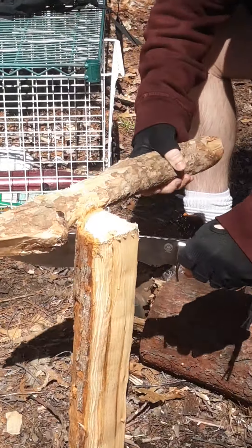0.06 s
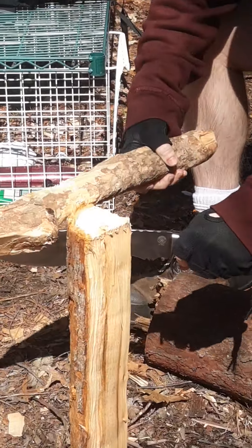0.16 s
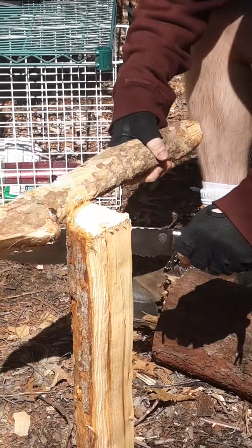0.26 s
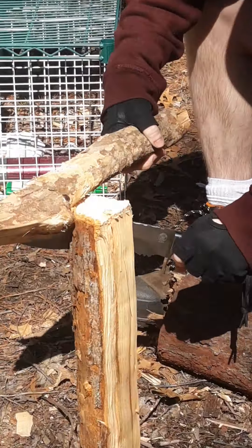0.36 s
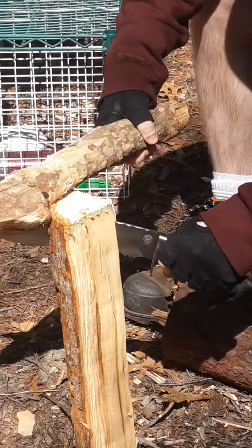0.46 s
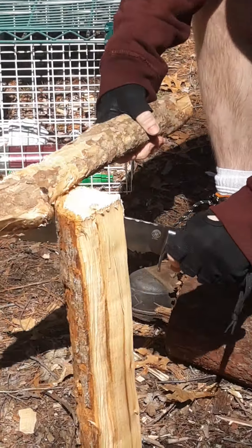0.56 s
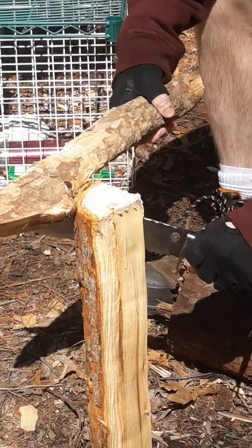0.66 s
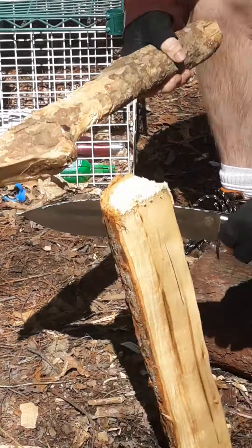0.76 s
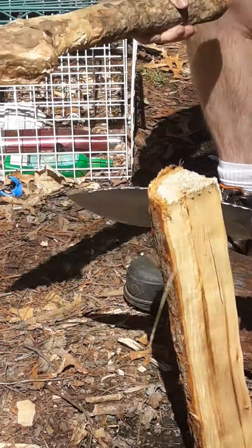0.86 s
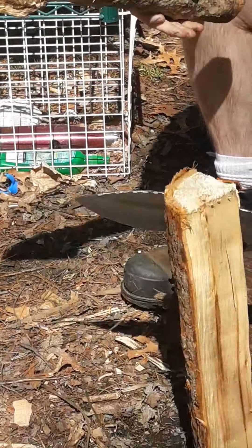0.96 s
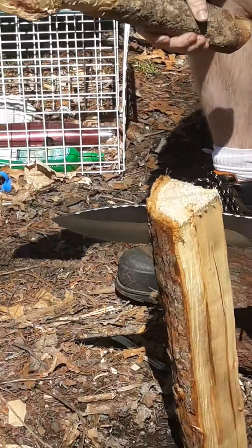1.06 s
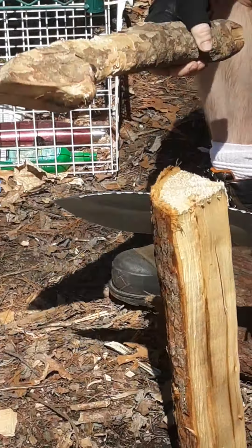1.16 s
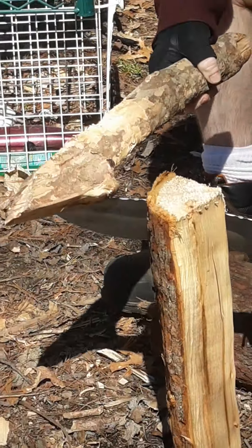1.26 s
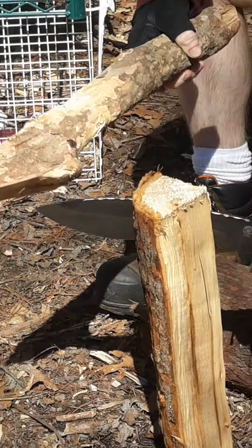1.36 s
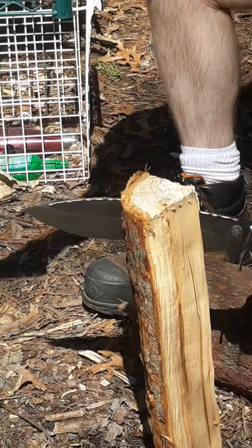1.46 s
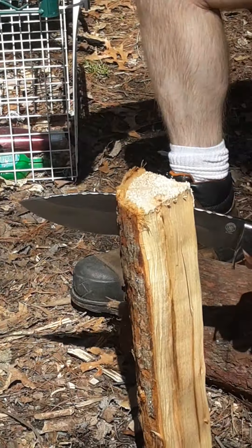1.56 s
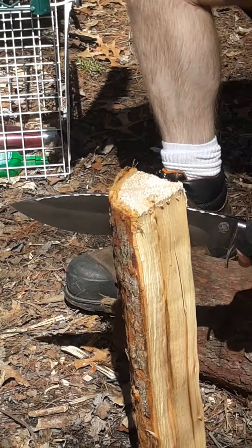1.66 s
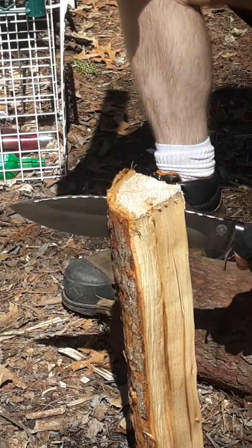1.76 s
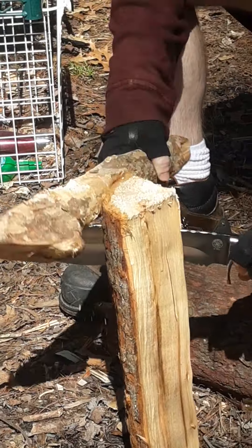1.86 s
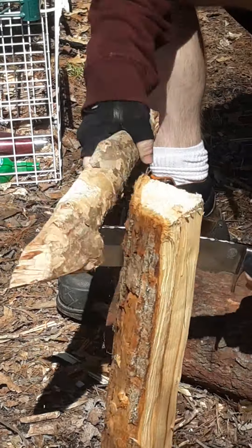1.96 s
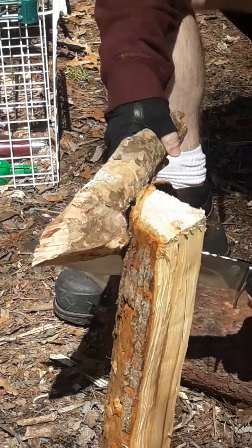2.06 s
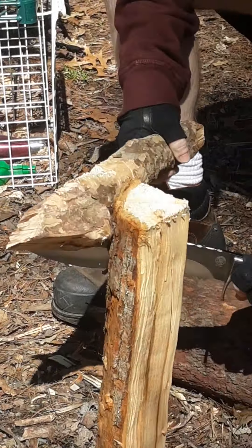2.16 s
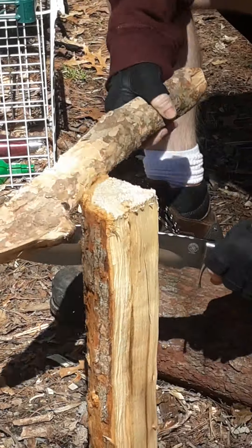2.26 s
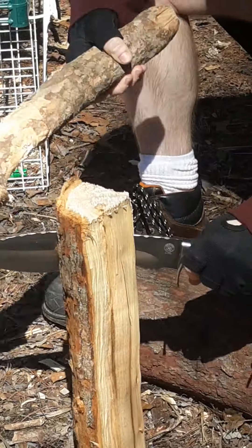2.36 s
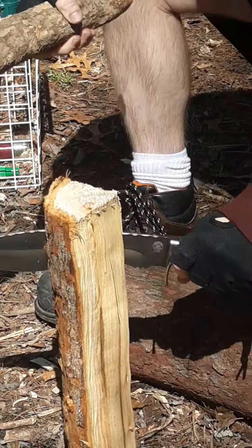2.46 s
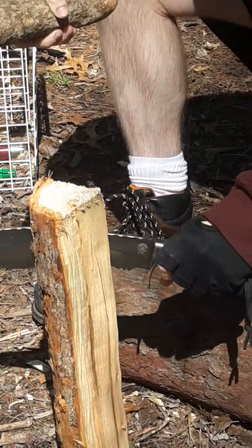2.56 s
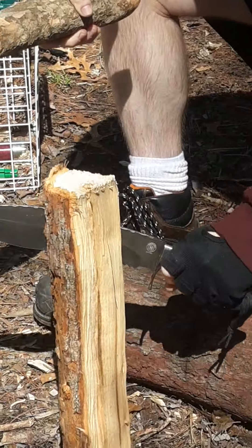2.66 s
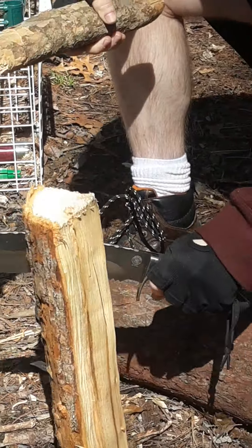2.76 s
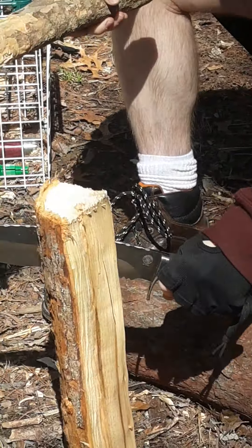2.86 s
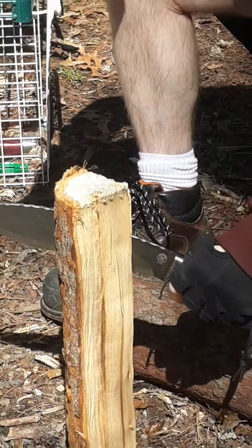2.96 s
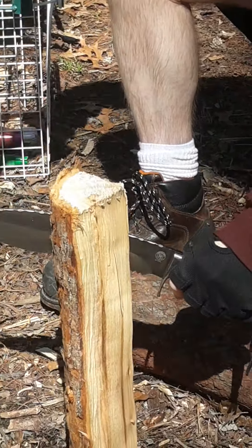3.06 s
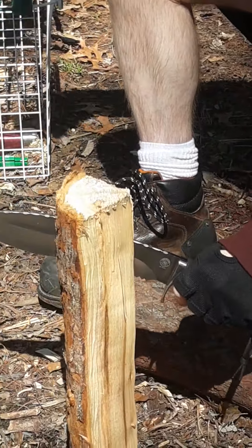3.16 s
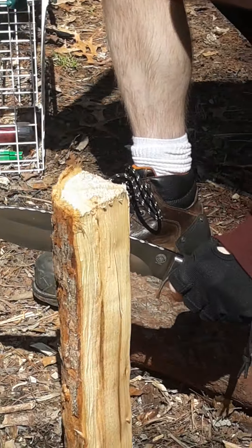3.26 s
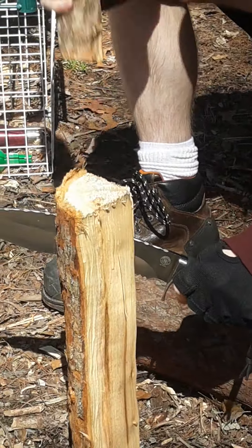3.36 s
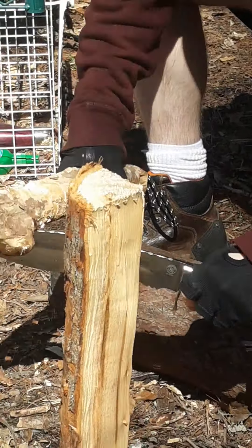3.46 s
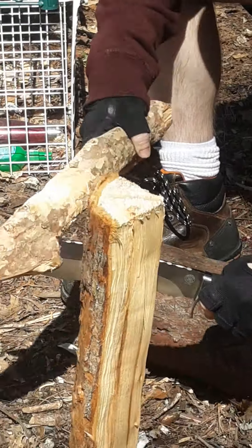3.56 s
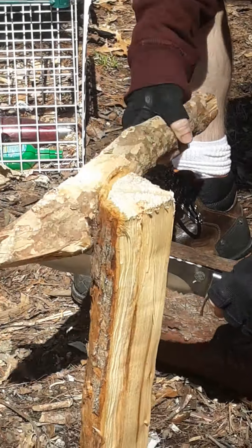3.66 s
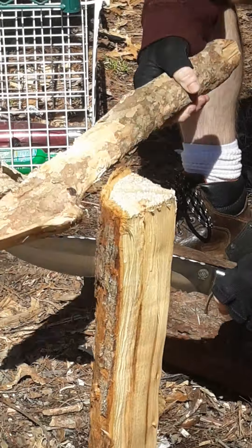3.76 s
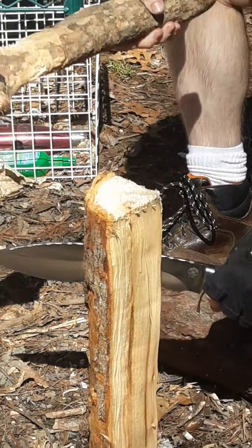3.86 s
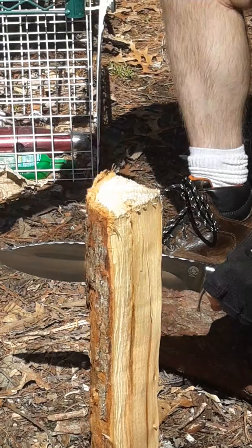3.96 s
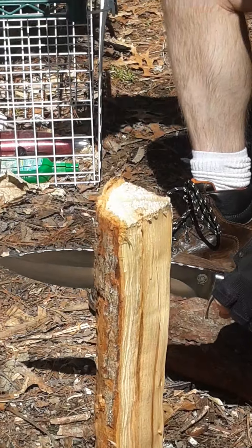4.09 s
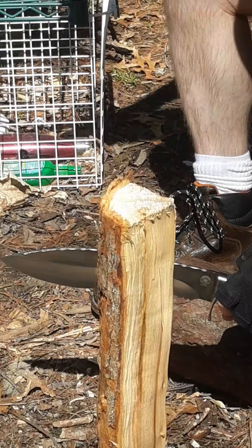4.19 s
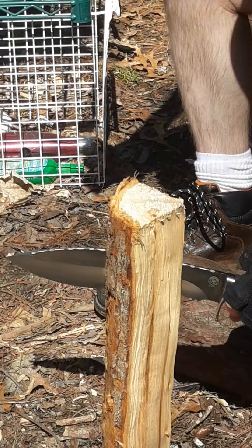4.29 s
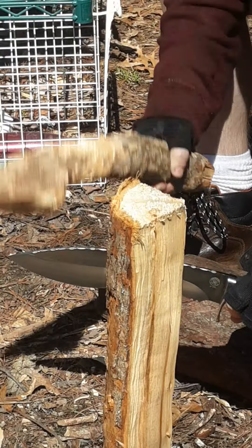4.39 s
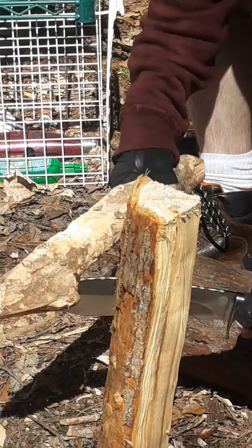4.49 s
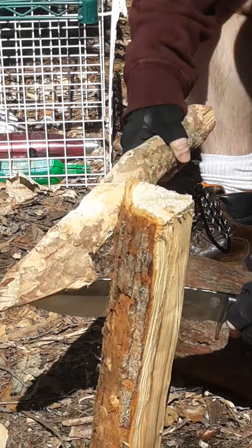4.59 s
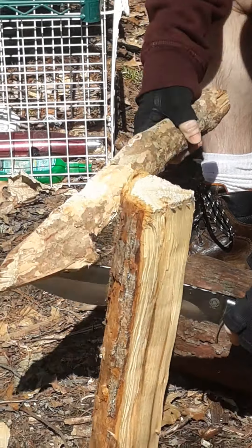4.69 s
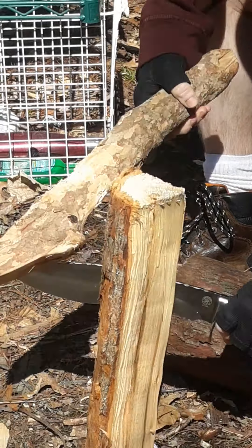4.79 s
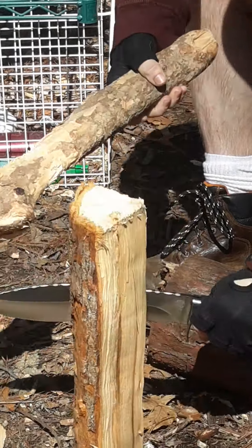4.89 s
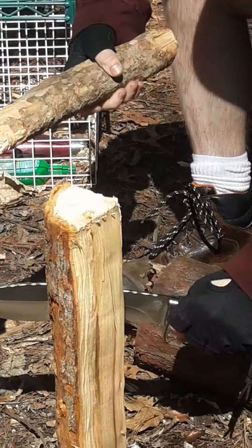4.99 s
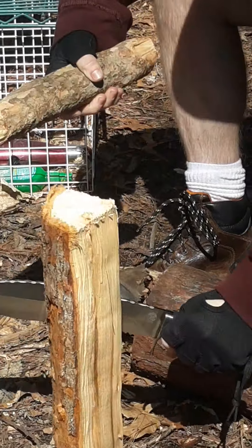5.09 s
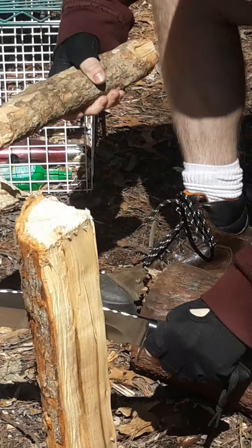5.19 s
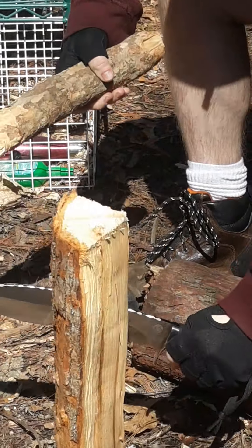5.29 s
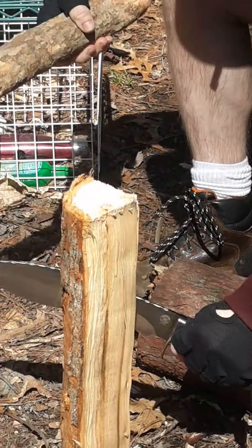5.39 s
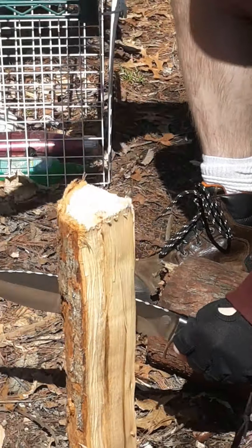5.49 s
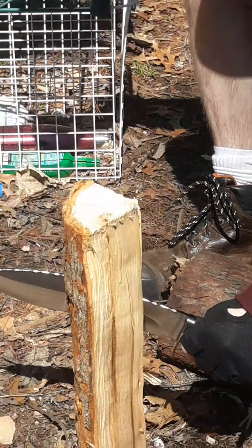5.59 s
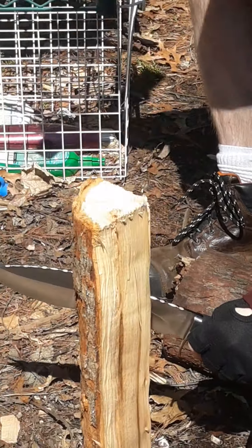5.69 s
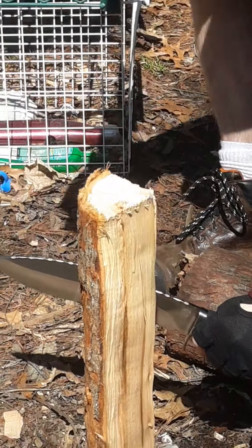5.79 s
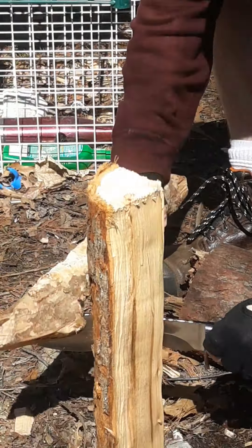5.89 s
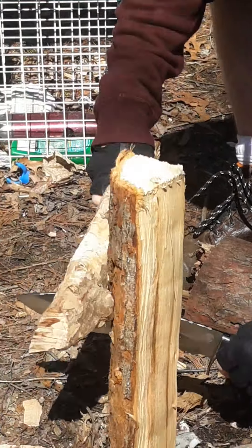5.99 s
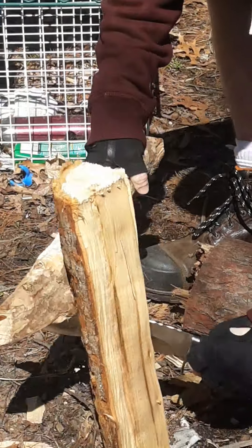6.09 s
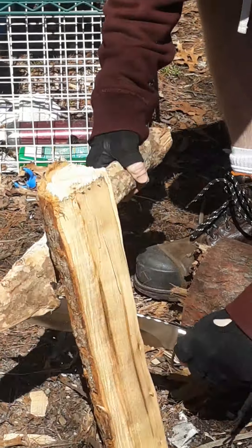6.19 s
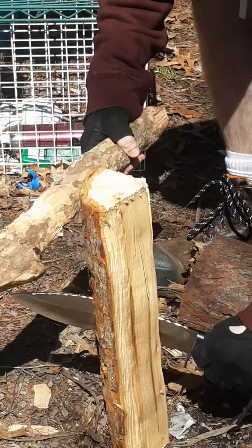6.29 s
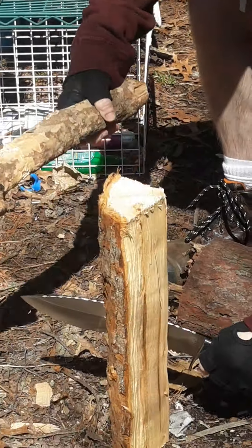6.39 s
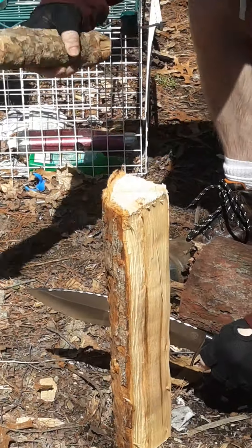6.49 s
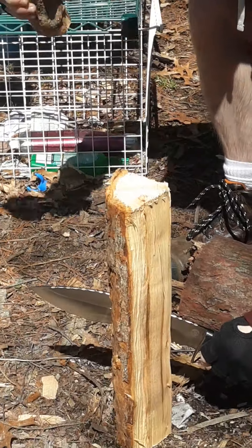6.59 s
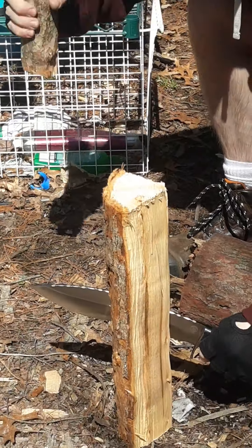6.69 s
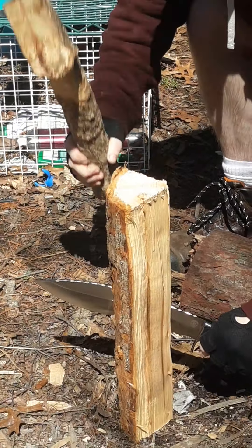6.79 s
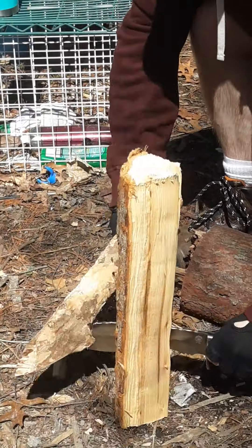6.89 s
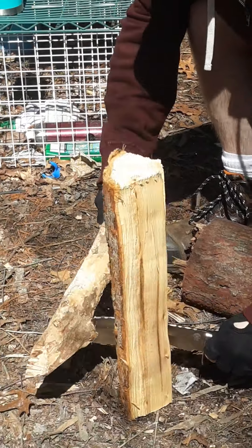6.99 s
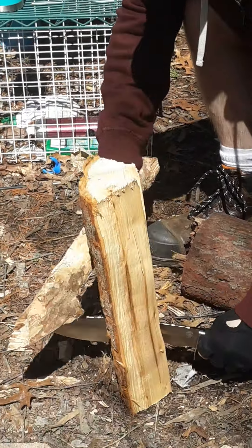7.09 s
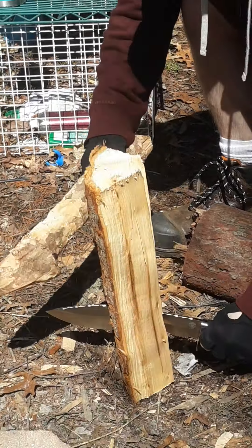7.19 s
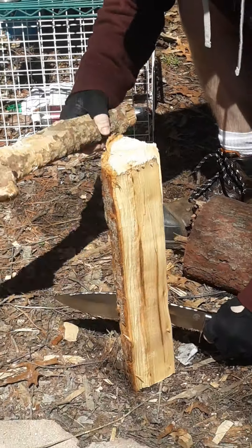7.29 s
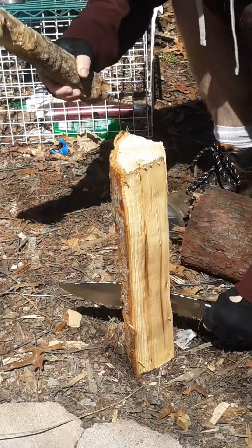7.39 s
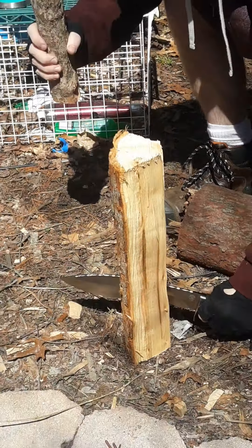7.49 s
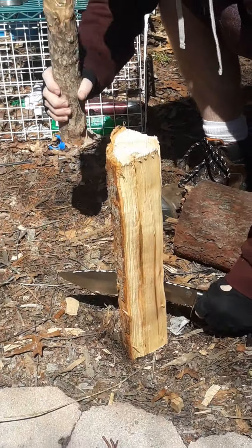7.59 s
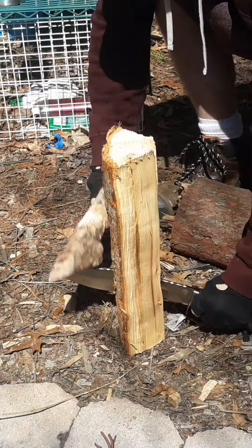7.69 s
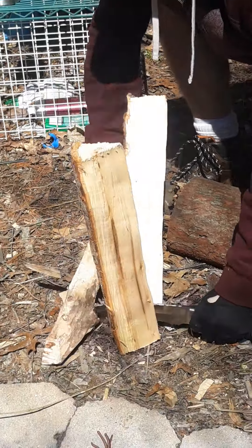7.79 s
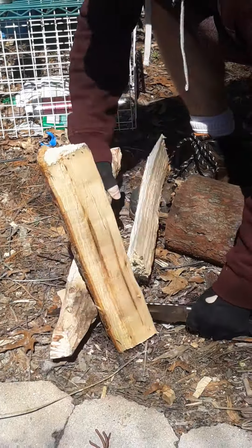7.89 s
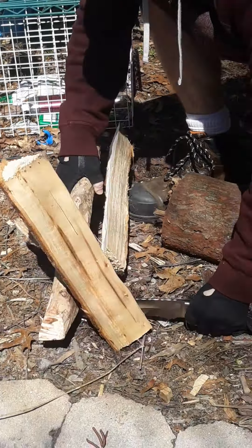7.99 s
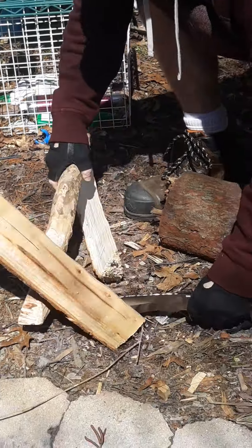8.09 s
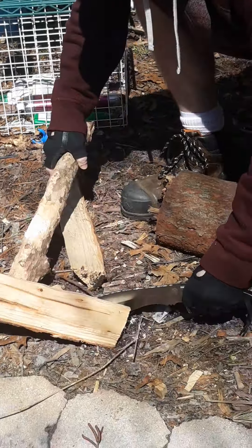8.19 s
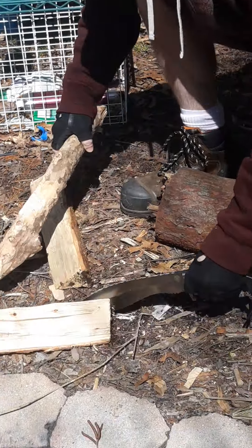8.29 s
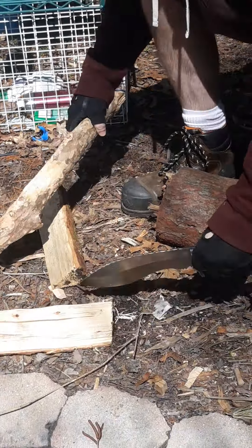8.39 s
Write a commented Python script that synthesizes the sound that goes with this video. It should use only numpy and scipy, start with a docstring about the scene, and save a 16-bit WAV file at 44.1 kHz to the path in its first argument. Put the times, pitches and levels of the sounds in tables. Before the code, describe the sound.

In a quiet yard, dry leaves and clothes rustle softly close by, with small twig clicks. A faint woodpecker chatters in quick, short notes until about 3.5 seconds, and distant traffic swells and fades throughout with a low engine hum. A branch strikes the back of a knife wedged in a log at about 1.9, 3.5, 4.5, 5.9, 6.9 and 7.7 seconds. Each blow is a loud, close, dry wooden crack, trailed by crackling fibres and a brief metallic rattle of the blade. The tearing is strongest after the first, second and fourth blows, with a sharp snap at 6 seconds. Between 6.4 and 7.4 seconds a far crow caws three times and a small bird whistles twice, both barely audible. The last blow splits the log, and the halves tumble with light knocks from 7.9 seconds, landing with a thud at 8.3.

```python
"""A branch strikes the spine of a knife six times and drives it down a log: each blow cracks and rings
the wood, fibres tear and snap, the wedged blade rattles, the halves fall. Dry leaves and clothes rustle
close by as grainy hiss. A woodpecker chatters in short arched notes, a small bird whistles, a crow caws
hoarsely, and far-off road traffic swells with rumble, tyre roar and an engine note.
A phone with two microphone ports listens in a yard."""
import sys
import numpy as np
from scipy import signal
from scipy.fft import rfft, irfft, next_fast_len
from scipy.io import wavfile
from scipy.ndimage import uniform_filter1d, map_coordinates

SR = 44100
rng = np.random.default_rng(int(sys.argv[2]) if len(sys.argv) > 2 else 0)


def transcribe(signal):
    """Save signal, clipped to [-1, 1], as a 16-bit WAV file at the path in sys.argv[1]."""
    frames = np.atleast_2d(signal).T
    limited = np.clip(frames, -1, 1)
    pcm = np.round(limited * 32767).astype(np.int16)
    wavfile.write(sys.argv[1], SR, pcm)


N = 372644

# Hits of branch, blade, log and ground: (time [s], crack [dB], ground [dB], branch [dB], log [dB],
# log tilt [dB/octave], upper wood [dB])
HITS = [(1.898, -19.5, -28, -24.5, -21.5, 9, -8), (1.9089, -31, -25.5, -12.5, -19, 4.5, -21.5),
        (1.934, -39, -29, -33.5, -40.5, 1, -27), (3.464, -16.5, -32.5, -27.5, -22, 2.5, -7.5),
        (3.4753, -24.5, -26.5, -21, -28.5, 5, -16), (3.5004, -31, -31.5, -37, -36.5, -0.5, -28.5),
        (4.4533, -13.5, -37, -29.5, -17.5, 5, -8), (4.4631, -29.5, -33.5, -37.5, -33, 5.5, -19.5),
        (4.6688, -67, -63, -48, -47.5, 4, -54), (5.9237, -16.5, -30, -24, -19.5, 5.5, -4),
        (5.936, -19.5, -32, -28.5, -33, 3.5, -13.5), (6.8839, -21.5, -53, -30.5, -20.5, 9, -9.5),
        (6.892, -22.5, -47, -43, -43, -7, -23), (7.7446, -19, -59, -23.5, -13.5, 6.5, -21),
        (7.772, -36, -41, -36.5, -38.5, -1, -26.5), (8.31, -34.5, -34, -32.5, -21.5, 3, -39)]
# Modes a hit rings, in order ground, ground, log, branch, log, log, upper wood, crack:
# (pitch [Hz], level [dB], t60 [s], pan left [dB], left phase lead [rad], phase drift per sample [rad])
HIT_MODES = [(59.5, -3, .15, 1, .3, .04), (115, -2, 0.22, -0.5, 0.3, 0.062),
             (294, 0.5, 0.044, -1, 0.28, 0.098), (501, -1, 0.06, -4, 0.37, 0.017),
             (699, -4, 0.032, .5, 0.4, 0.11), (924, -1.5, 0.022, 2.5, 0.2, 0.14),
             (1269.7, 0, 0.031, 2.5, 1.7, 0.072), (2209.5, 0.5, 0.024, 8, 2, 0.2)]

def blows():
    """Every contact gives a sharp crack and rings the modes of wood and ground."""
    out = np.zeros((2, N))
    pivot_hz = 463
    for s, crack_db, ground_db, branch_db, log_db, tilt_db, upper_db in HITS:
        add(out, s, amp(crack_db) * pan(2.6) * puff(.016))
        log = [log_db + tilt_db * np.log2(mode[0] / pivot_hz) for mode in HIT_MODES]
        drives = [ground_db, ground_db, log[2], branch_db, log[4], log[5], upper_db, crack_db]
        for drive_db, (hz, db, t60, pan_db, lead, drift) in zip(drives, HIT_MODES):
            add(out, s, amp(db + drive_db) * pan(pan_db) * ring(hz, t60, lead, drift, attack_s=.0018))
    return out


# Tears, the first the tail of an earlier blow:
# (time [s], level [dB], t60 [s], low blade ring [dB], high blade ring [dB])
TEARS = [(0, -66, 0.97, -49.5, -49.5), (1.897, -21, 0.4, -27.5, -37.5), (3.463, -19.5, 0.39, -25.5, -34),
         (4.455, -33, 0.43, -31.5, -30), (5.924, -21.5, 0.4, -25.5, -28), (6.885, -37, 0.31, -38.5, -51),
         (7.747, -26.5, 0.16, -43, -47), (8.312, -45.5, 0.13, -53, -57)]
# Resonances of the splitting log, four of body, two of treble: (centre [Hz], width [Hz], level [dB])
LOG_BANDS = [(75, 240, -5), (530, 510, -11.5), (1260, 400, -1), (1930, 490, -5), (4300, 2500, -3.5),
             (11100, 9800, -7)]
# Low and high resonance of the wedged blade: (centre [Hz], width [Hz], level [dB])
BLADE_BANDS = [(1310, 76, 1.77), (2120, 88, -3.5)]

def tearing():
    """After each blow the split runs on: dying crackle through the log, and a rattle of the blade."""
    t = np.arange(N) / SR
    body, treble, blade_low, blade_high = np.zeros((4, N))
    treble_decay_ratio, rattle_t60_s = .77, .8
    for s, db, t60, low_ring_db, high_ring_db in TEARS:
        decay = lambda db, t60: (t > s) * amp(db - 60 * np.abs(t - s) / t60)
        body += decay(db, t60)
        treble += decay(db, treble_decay_ratio * t60)
        blade_low += decay(low_ring_db, rattle_t60_s)
        blade_high += decay(high_ring_db, rattle_t60_s)
    crackle = grains(lumpy_db=1.5, rate=210)
    wood = resonate(body * crackle, LOG_BANDS[:4]) + resonate(treble * crackle, LOG_BANDS[4:])
    steel = resonate(blade_low * crackle, BLADE_BANDS[:1])
    steel += resonate(blade_high * crackle, BLADE_BANDS[1:])
    return pan(.6) * (wood + steel)


# Snaps of fibre, twig and leaf: (time [s], level [dB], body over level [dB], length [s])
SNAP_CUES = [(0.856, -53.5, 1, 0.012), (0.929, -56, -6, .008), (1.034, -44.5, -23, 0.017),
             (1.1195, -43.5, -6.5, 0.0165), (1.2286, -60, -6, 0.012), (1.334, -45.5, -11, 0.011),
             (1.4419, -48, -16, .009), (1.453, -44, -15, .01), (1.536, -58, -7, .009),
             (1.6192, -58.5, -9, .01), (1.735, -54, -7, .009), (2.18, -53, .5, 0.013),
             (2.5543, -56, -5.5, 0.015), (2.919, -66.5, -8, .01), (3.7262, -53, 2, 0.0089),
             (3.7763, -52, -6, 0.018), (4.172, -56, -12, 0.013), (4.601, -42, -3, 0.0114),
             (4.74, -57, -4, 0.012), (5.456, -63, -13, .009), (5.4663, -57, -9, .011),
             (5.516, -65.5, -3.5, .012), (6.0269, -16, 3, .006), (6.2073, -44, 5.5, 0.0075),
             (6.282, -59.5, -8, 0.0095), (6.352, -60, -11, .01), (6.429, -60, -10, 0.011),
             (6.447, -64, -9, .01), (7.7162, -56, 9, 0.01), (7.909, -36.5, -5, 0.018),
             (7.932, -43, 2.5, 0.034), (7.9825, -52, -11, 0.013), (8.143, -45, -8, 0.0208),
             (8.312, -32.5, 20.5, 0.0095)]

def snaps():
    """Small things break with dry clicks, each with its own weight below the crossover."""
    top, body = np.zeros((2, 2, N))
    crossover_hz = 4600
    for s, db, body_db, length in SNAP_CUES:
        click = amp(db) * pan(1.5) * puff(length)
        add(top, s - .001, click)
        add(body, s - .001, amp(body_db) * click)
    top = filtered(top, lambda hz: 1 / (1 + (crossover_hz / (hz + 1)) ** 8))
    return top + filtered(body, lambda hz: 1 / (1 + (hz / crossover_hz) ** 8))


# Light wooden knocks: (time [s], level [dB], pitch [Hz], t60 [s])
KNOCKS = [(3.795, -56, 1500, 0.047), (6.934, -44.5, 294, 0.027), (7.063, -54.5, 316, 0.057),
          (7.909, -45.5, 675, 0.11), (7.943, -34.5, 220, 0.035), (7.983, -47, 695, 0.079),
          (8.147, -60.5, 1100, 0.13), (8.15, -45.5, 196, 0.068), (8.312, -42, 1063, 0.086),
          (8.322, -29.5, 196, 0.05)]

def knocks():
    """Pieces touch and tumble, each touch ringing one damped mode."""
    out = np.zeros((2, N))
    for s, db, hz, t60 in KNOCKS:
        add(out, s, amp(db) * pan(2.05) * ring(hz, t60, lead=.21, drift=.071, attack_s=.0004))
    return out


# Stirs of leaves or cloth: (time [s], level [dB], 10 dB swell [s], 10 dB fade [s], body over level [dB])
RUSTLES = [(.08, -82, 0.14, .2, 4), (.36, -66, 0.037, 0.15, 2.5), (.8, -66, 0.11, 0.099, -3.5),
           (1.12, -64.5, 0.089, 0.1, -2.5), (1.36, -71.5, 0.054, 0.12, -6), (1.7, -75.5, 0.21, 0.49, -1.5),
           (2.6, -75, 0.073, 0.17, -6), (3.07, -78.5, 0.107, 0.2, -6), (3.43, -77.5, 0.18, .2, 3),
           (4.9, -84, .2, .12, 1.5), (5.21, -72, 0.081, 0.12, -10.5), (5.88, -75.5, .2, .3, -3.5),
           (6.45, -88.5, .1, 0.11, 0), (6.76, -89, 0.11, .2, -5), (7.24, -86.5, 0.14, 0.17, 4.5),
           (8.06, -69.5, 0.19, 0.26, -9), (8.27, -71.5, .15, 0.12, -8), (8.37, -70, 0.037, 0.063, 8)]
# Tone of the rustle: (frequency [Hz], gain [dB])
RUSTLE_EQ = [(900, -20), (2500, -2), (4500, 2.5), (5800, 4.5), (8800, 5), (12000, 9), (16000, 6.5)]

def rustle():
    """Leaves and cloth stir in swells of grainy hiss, over a faint steady hiss."""
    t = np.arange(N) / SR
    rest_db, steady_db = -98, -90
    top_gain, body_gain = np.full((2, 2, N), amp(rest_db))
    for s, db, swell, fade, body_db in RUSTLES:
        stir = amp(db - 10 * np.maximum((s - t) / swell, (t - s) / fade))
        top_gain += stir
        body_gain += amp(body_db) * stir
    hiss = filtered(grains(lumpy_db=2, rate=130), lambda hz: amp(along(RUSTLE_EQ, hz)))
    body = filtered(hiss, lambda hz: 1 / (1 + (hz / 4700) ** 6))
    steady = filtered(rng.standard_normal((2, N)), lambda hz: 1 / (1 + (5000 / (hz + 1)) ** 4))
    return top_gain * (hiss - body) + body_gain * body + amp(steady_db) * steady


# Contour of the woodpecker's call: (time [s], level [dB], pitch [Hz])
CHATTER = [(0, -70, 2170), (.3, -77, 2160), (.65, -77.5, 2270), (1.1, -71, 2160), (1.8, -70, 2160),
           (2.3, -76.5, 2120), (2.9, -87.5, 2110), (3.4, -76, 2110)]

def woodpecker():
    """A long run of short notes, each arching in pitch; the first few come closer together."""
    out = np.zeros((2, N))
    notes, note_s, spacing_s = 31, .03, .1127
    u = np.linspace(0, 1, round(note_s * SR))
    call_db, call_hz = automation(CHATTER)
    for k, (louder, higher) in enumerate(rng.standard_normal((notes, 2))):
        hurry_s = .05 * (1 - np.exp(-k / 5))
        s = .056 + k * spacing_s - hurry_s
        db = call_db[round(s * SR)] + 1.2 * louder
        hz = call_hz[round(s * SR)] * (1 + .006 * higher)
        phase = 2 * np.pi * np.cumsum(hz * (1.01 - .41 * (u - .45) ** 2)) / SR
        rasp = .063 * np.cumsum(rng.standard_normal(len(u)))
        add(out, s, amp(db) * pan(.5) * np.sin(np.pi * u) * np.sin(phase + rasp))
    return out


# The small bird's notes: (time [s], length [s], pitch [Hz], level [dB])
WHISTLE_CUES = [(6.681, 0.074, 6650, -87.5), (6.8, 0.095, 8220, -81)]

def small_bird():
    """Two thin whistles: pure tones that fade in and out."""
    out = np.zeros((2, N))
    for s, length, hz, db in WHISTLE_CUES:
        t = np.arange(round(length * SR)) / SR
        add(out, s, amp(db) * pan(.58) * np.sin(np.pi * t / length) * np.sin(2 * np.pi * hz * t))
    return out


# The crow's calls: (time [s], length [s], top pitch [Hz], level [dB])
CAW_CUES = [(6.399, 0.19, 762, -81.5), (6.78, 0.19, 752, -80.5), (7.179, .22, 739, -79.5)]
# Timbre of a caw: (harmonic [number], level [dB])
CAW_HARMONICS = [(2, 8.5), (3, -3.5), (4, -9)]

def crow():
    """Three harmonics arch in pitch, roughened by noise into a hoarse caw."""
    out = np.zeros((2, N))
    for s, length, top_hz, db in CAW_CUES:
        u = np.arange(round(length * SR)) / (length * SR)
        hoarse = .63 + unit(uniform_filter1d(rng.standard_normal((2, len(u))), size=170))
        phase = 2 * np.pi * np.cumsum(top_hz * (1 - .16 * (u - .22) ** 2)) / SR
        voice = sum(amp(level) * np.sin(k * phase) for k, level in CAW_HARMONICS)
        add(out, s, amp(db) * np.sqrt(np.sin(np.pi * u)) * hoarse * voice)
    return out


# Swells of the tyre roar: (time [s], level [dB])
ROAR_FADER = [(0, -74), (.49, -75), (.8, -75.5), (1.1, -67.5), (1.5, -64.5), (1.85, -64), (2.16, -70.5),
              (2.6, -75.5), (2.95, -74), (3.2, -65.5), (3.41, -60.5), (3.9, -71.5), (4.19, -76),
              (4.66, -72.5), (5.5, -77.5), (5.72, -68), (5.9, -62.5), (6.3, -73), (6.78, -76), (7.45, -72),
              (8, -70), (8.25, -67), (8.45, -66.5)]
# A far engine note: (time [s], pitch [Hz], level [dB])
ENGINE_NOTE = [(.8, 160, -88), (1.5, 163, -72.5), (2.4, 155.4, -76), (2.9, 147.4, -80.5), (3.6, 152.2, -66),
               (4, 158.2, -71.5), (5.05, 154.1, -74.5), (5.9, 139.1, -56.5), (6.8, 147.2, -72.5),
               (7.4, 155.2, -71), (8.45, 156.5, -72.5)]
# Tone of the road rumble: (frequency [Hz], gain [dB])
RUMBLE_EQ = [(15, -56), (25, -20), (65, 1), (150, 2), (199, -3), (275, -10.5), (350, -14), (460, -37.5),
             (770, -120)]
# Tone of the tyre roar: (frequency [Hz], gain [dB])
TYRE_EQ = [(150, -35), (250, -14), (345, 0), (710, -6.5), (813, -4.5), (1670, -20), (1900, -24.5),
           (2470, -62.5), (4180, -120)]

def traffic():
    """Cars pass far off: tyre roar, a rumble that follows it with wider swings, a wavering engine."""
    roar_db, = automation(ROAR_FADER)
    usual_db, rumble_lift_db, rumble_swing = -68, 5, 1.15
    rumble_db = usual_db + rumble_lift_db + rumble_swing * (roar_db - usual_db)
    hz, db = automation(ENGINE_NOTE)
    engine = amp(db + 1.7 * wobble(5.7)) * np.sin(2 * np.pi * np.cumsum(hz + 2.8 * wobble(21)) / SR)
    rumble = amp(rumble_db + 2 * wobble(8.5)) * stereo_noise(RUMBLE_EQ)
    tyres = amp(roar_db + 1.3 * wobble(4.3)) * stereo_noise(TYRE_EQ)
    return rumble + tyres + engine


# Reverb time of the yard: (frequency [Hz], t60 [s])
YARD_DECAY = [(150, 0.45), (1300, 0.32), (4000, 0.81), (12000, .2)]

def yard(send):
    """Fences, walls and trees answer; each frequency dies at its own speed."""
    hz, t, noise = signal.stft(rng.standard_normal((2, SR // 2)), SR, nperseg=256)
    tail = signal.istft(noise * amp(-60 * t / along(YARD_DECAY, hz)[:, None]), SR, nperseg=256)[1]
    predelayed = np.pad(send, ((0, 0), (500, 0)))
    return signal.fftconvolve(predelayed, tail / np.linalg.norm(tail[0]), axes=1)[:, :N]


# Stereo image of the noise: (frequency [Hz], left-right correlation [-1 to 1])
CORRELATION = [(60, 0.98), (180, 0.98), (550, 0.8), (1650, 0.22), (4970, -0.36), (15000, 0.76)]

def stereo_noise(eq):
    """Shaped noise of rms 1, alike at both ports in the bass."""
    def mid_side(hz):
        width = np.arccos(np.clip(along(CORRELATION, hz), -1, 1)) / 2
        return amp(along(eq, hz)) * [np.cos(width), np.sin(width)]
    mid, side = filtered(rng.standard_normal((2, N)), mid_side)
    return unit(np.array([mid + side, mid - side]))


def grains(lumpy_db, rate):
    """Noise in quick lumps of uneven size; both ports share the lumps."""
    return unit(amp(lumpy_db * wobble(rate)) * stereo_noise([(20, .013), (20000, 0)]))


def ring(hz, t60, lead, drift, attack_s):
    """A damped mode at both ports; its phase drifts, as wood is not a pure resonator."""
    t = np.arange(SR // 3) / SR
    wander = np.cumsum(rng.standard_normal(len(t))) * drift
    envelope = amp(-60 * t / t60) * (1 - np.exp(-t / attack_s))
    return envelope * np.sin(2 * np.pi * hz * t + wander + [[lead / 2], [-lead / 2]])


def puff(length):
    """A burst of noise that falls 30 dB in length seconds."""
    t = np.arange(SR // 10) / SR
    burst = amp(-30 * t / length) * (1 - np.exp(-t / .0006)) * rng.standard_normal((2, len(t)))
    edge = np.diff(burst, prepend=0)  # small sources radiate little bass
    return signal.lfilter([1], [1, -.35], edge)  # a contact lasts long enough to soften the top end


def resonate(x, bands):
    """x through parallel band-pass resonances."""
    return filtered(x, lambda hz: sum(amp(db) * 1j * hz * width / (centre**2 - hz**2 + 1j * hz * width)
                                      for centre, width, db in bands))


def filtered(x, response):
    """x times a complex response of frequency."""
    size = next_fast_len(N + SR // 2)
    return irfft(rfft(x, size) * response(np.fft.rfftfreq(size, 1 / SR)), size)[..., :N]


def wobble(rate):
    """A smooth random curve, rate knots a second."""
    return map_coordinates(rng.standard_normal(int(N * rate / SR) + 4), [np.arange(N) * rate / SR])


def automation(rows):
    """One value per sample for each column after the time."""
    times, *columns = np.transpose(rows)
    return [np.interp(np.arange(N) / SR, times, column) for column in columns]


def along(points, hz):
    """Read (frequency, value) points at hz on a log axis."""
    knots_hz, values = np.transpose(points)
    return np.interp(np.log(hz + 1), np.log(knots_hz + 1), values)


def add(track, s, sound):
    """Mix a stereo sound in at s seconds."""
    part = track[:, round(s * SR):][:, :sound.shape[1]]
    part += sound[:, :part.shape[1]]


def pan(left_db):
    """Channel gains, the left left_db over the right."""
    return amp([[left_db / 2], [-left_db / 2]])


def amp(db):
    """Gain of a level in dB."""
    return 10 ** (np.asarray(db) / 20)


def unit(x):
    """x at rms 1."""
    return x / np.sqrt(np.mean(x ** 2) + 1e-20)


def scene():
    """Close wood almost dry, far birds with more reverb, over rustle and traffic."""
    wood = blows() + snaps() + knocks()
    birds = woodpecker() + small_bird() + crow()
    reverb = yard(amp(-29) * wood + amp(-10.5) * birds)
    return wood + tearing() + birds + reverb + rustle() + traffic()


# Tone of the phone: (frequency [Hz], gain [dB])
PHONE_EQ = [(20, -10.5), (60, -5), (200, 0.79), (3000, 6.9), (5300, 4), (6500, 12), (7000, 6), (7600, -8),
            (9300, -9), (11500, -7.5), (15550, -9), (15850, -40.5)]

def record(dry):
    """The phone's ports resonate near 6.5 kHz; the treble above is duller, cut steeply near 15.8 kHz."""
    cepstrum = irfft(np.log(amp(along(PHONE_EQ, np.fft.rfftfreq(4096, 1 / SR)))))
    cepstrum[1:2048] *= 2  # minimum phase: the EQ rings only after a hit
    cepstrum[2049:] = 0
    impulse = irfft(np.exp(rfft(cepstrum)))
    coloured = signal.fftconvolve(dry, impulse[None], axes=1)[:, :N]
    return filtered(coloured, lambda hz: hz < 16900)


dry = scene()
out = record(dry)
transcribe(out)
```